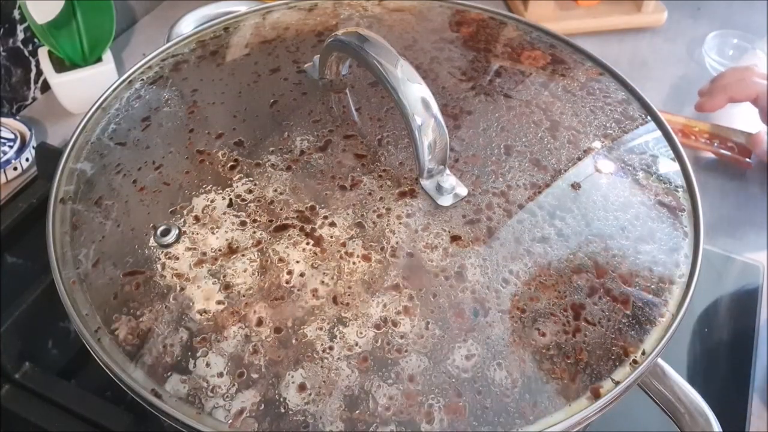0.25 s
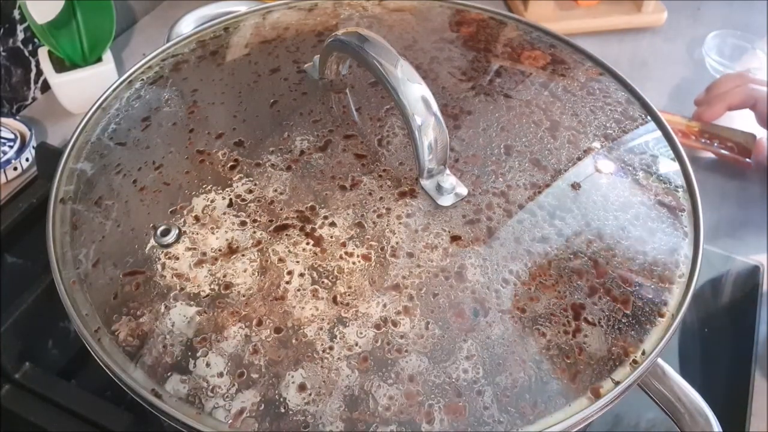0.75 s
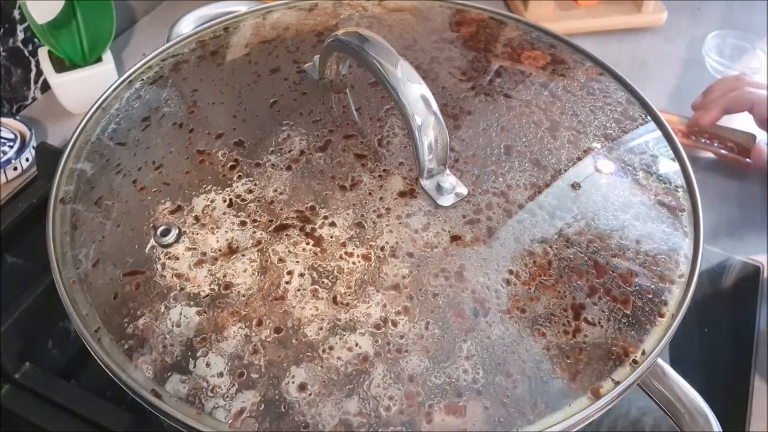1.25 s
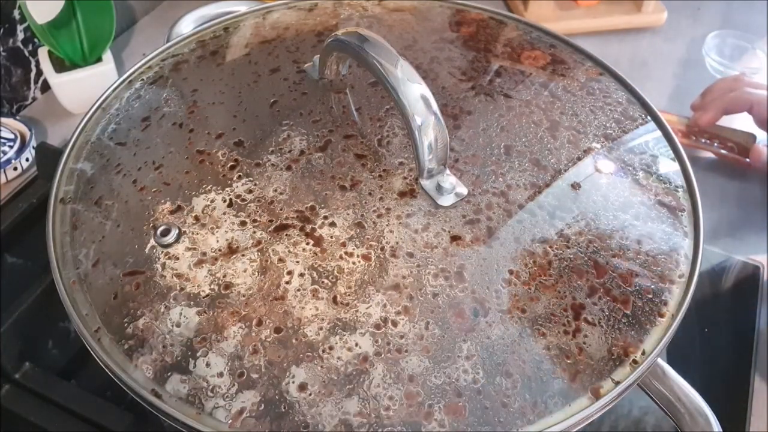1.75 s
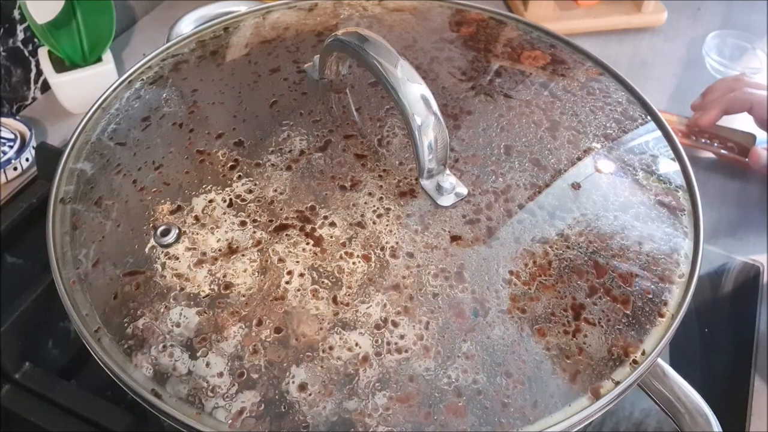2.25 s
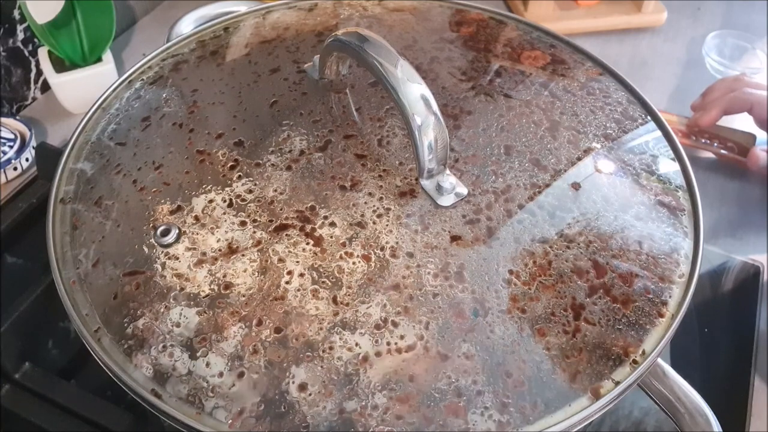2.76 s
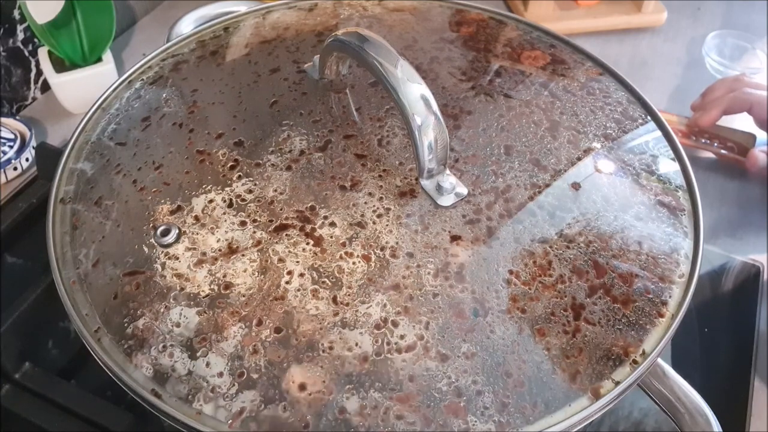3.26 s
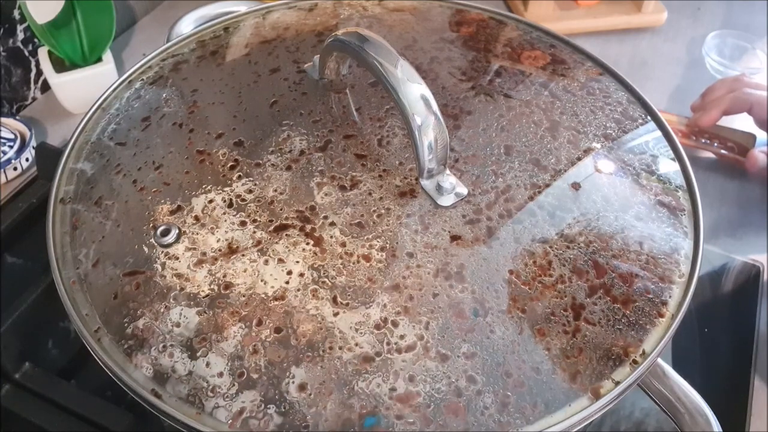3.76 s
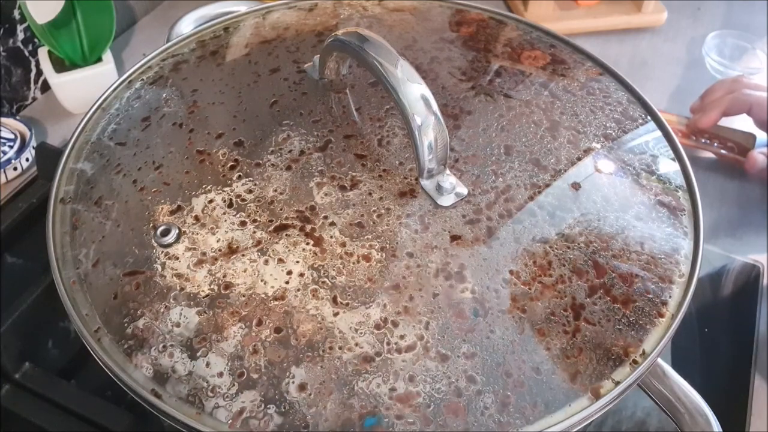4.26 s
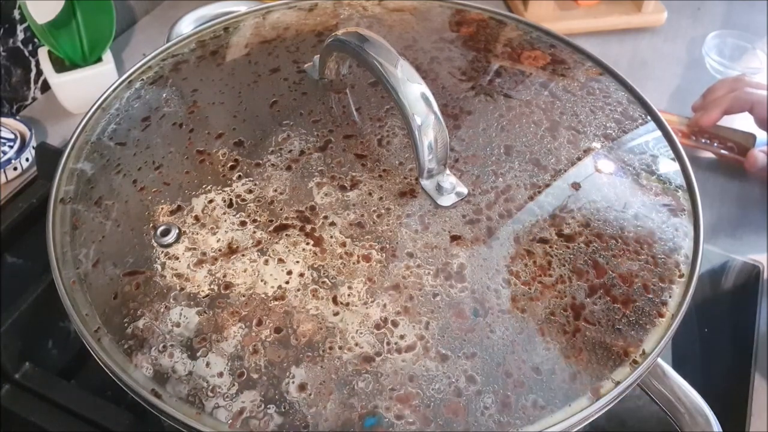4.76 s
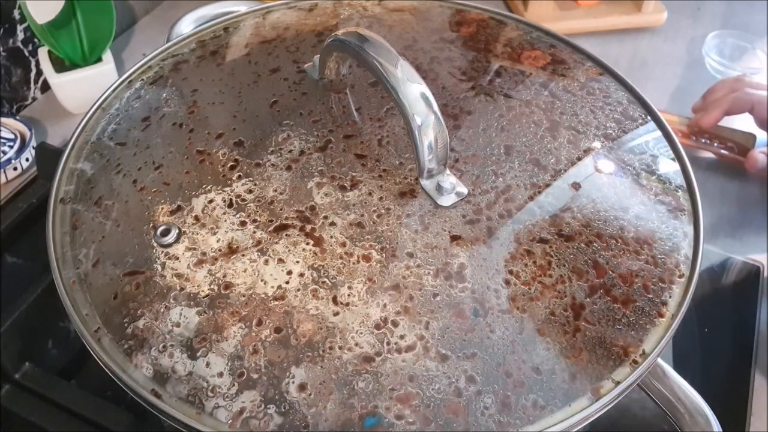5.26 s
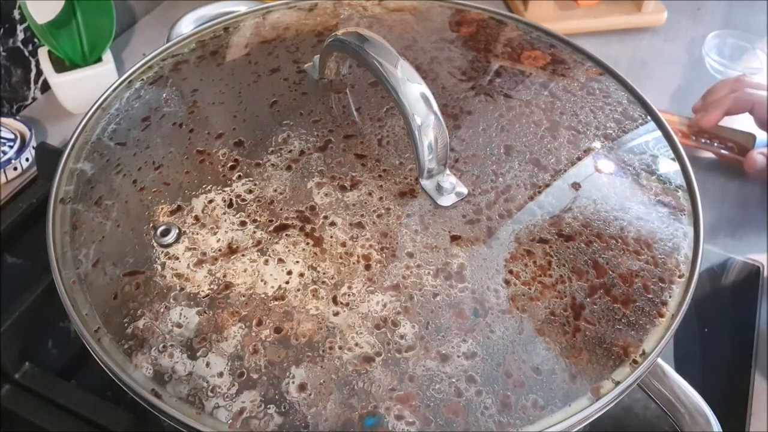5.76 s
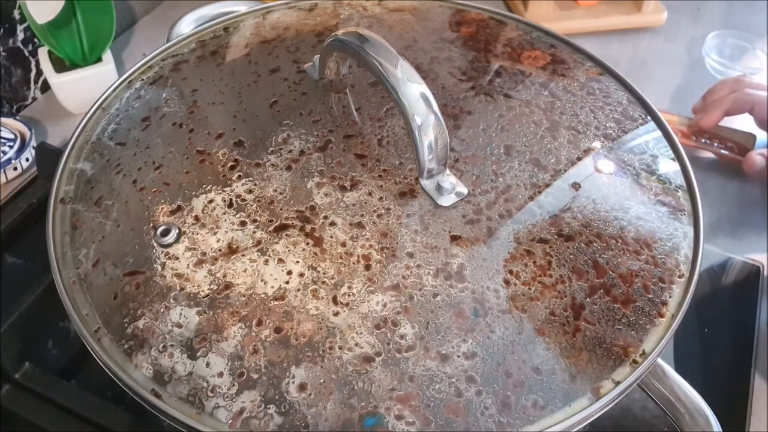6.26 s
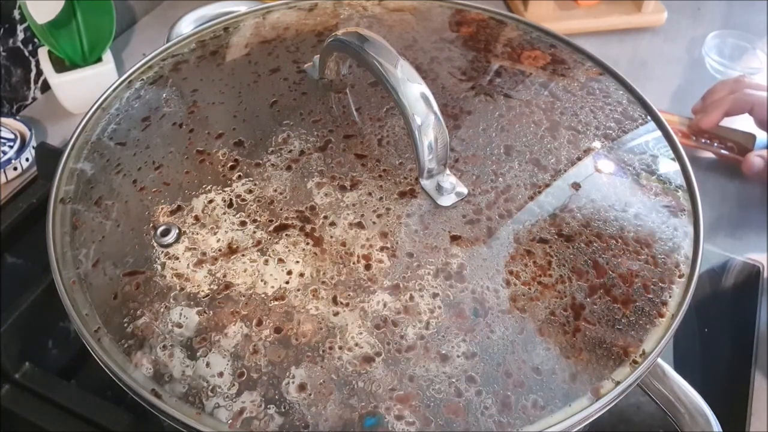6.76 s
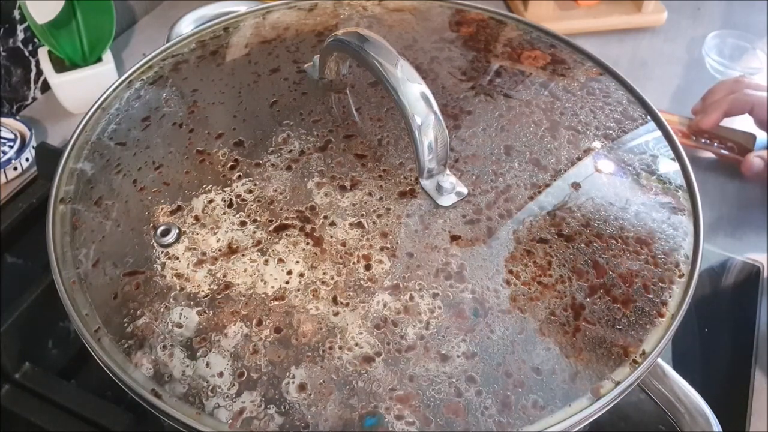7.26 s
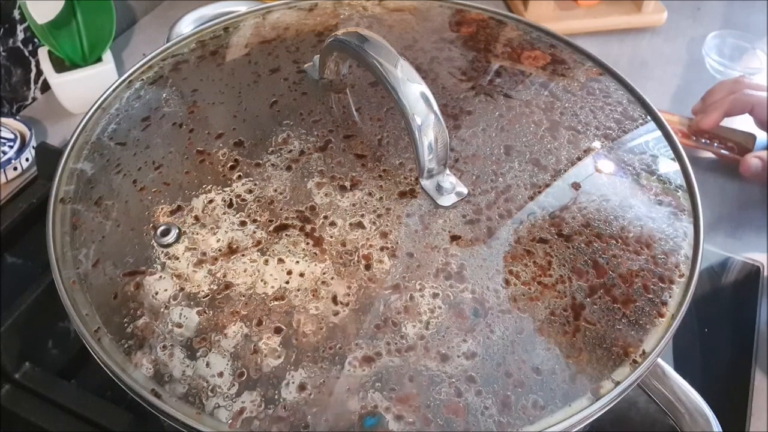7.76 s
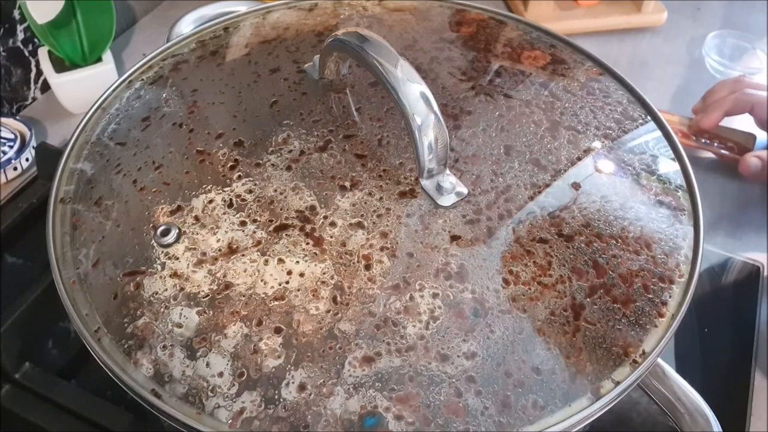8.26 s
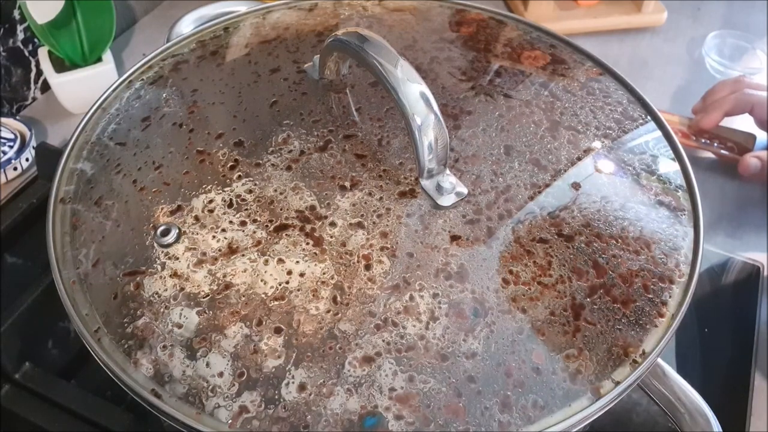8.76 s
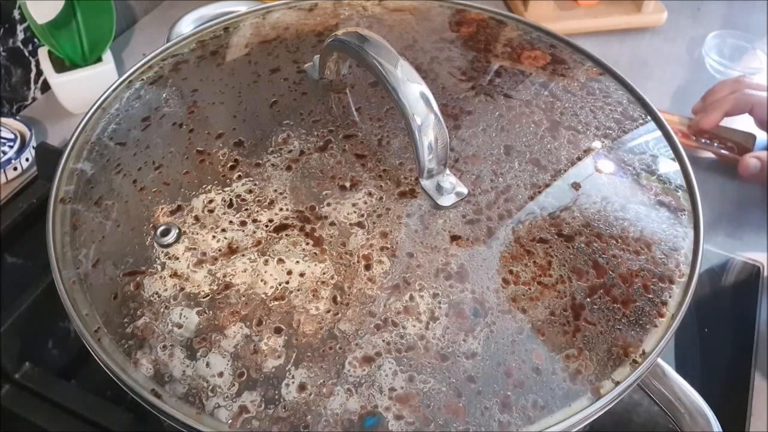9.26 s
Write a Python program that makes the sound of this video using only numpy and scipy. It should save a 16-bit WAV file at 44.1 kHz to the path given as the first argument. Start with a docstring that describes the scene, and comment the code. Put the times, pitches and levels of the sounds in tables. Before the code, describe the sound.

Popcorn bursts under a glass lid, heard close in stereo with slight room reflections. Each pop is a brief splintery crack with a pan knock and a muffled thump, some with a puff of steam. Quick pops at the start thin into scattered ones, kernels rattle off the lid, and the loudest flurry comes late before sparse pops end it. Soft hissing oil and steady low rumble stay behind.

```python
"""Popcorn pops, knocks and thumps over a faint oil sizzle and a low rumble, close by in a small kitchen.
Each kernel bursts in a steel pan under a glass lid: a crack of splintered noise that rings the pan modes,
a knock, a high steam fizz and a low thump of the air under the lid.
Hard kernels strike pan and lid as bursts of banded noise with ringing modes; split hulls jet swelling hiss.
The oil is shaped noise that flares after every burst; a diffuse noise tail is the room."""
import sys
import numpy as np
from scipy import signal
from scipy.fft import rfft, irfft
from scipy.io import wavfile

SR = 44100
rng = np.random.default_rng(int(sys.argv[2]) if len(sys.argv) > 2 else 0)


def transcribe(signal):
    """Save signal, clipped to [-1, 1], as a 16-bit WAV file at the path in sys.argv[1]."""
    frames = np.atleast_2d(signal).T
    limited = np.clip(frames, -1, 1)
    pcm = np.round(limited * 32767).astype(np.int16)
    wavfile.write(sys.argv[1], SR, pcm)


N = 418950
RING_S = np.arange(int(0.3 * SR)) / SR  # time axis of one event
MODE_T60_S = 0.058  # sudden decay of a mode at 2 kHz

# bursting kernels: (time [s], crack level [dB], hardest rung mode [Hz], next hardest [Hz],
# knock level [dB], knock mode [Hz], steam fizz level [dB], thump level [dB])
POPS = [(0.109, -45.5, 2610, 6030, -52, 1000, -56, -36), (0.191, -39, 2012, 5630, -37, 736, -66, -45.5),
        (0.413, -43, 1567, 3900, -51.5, 1290, -54, -38), (0.484, -42.5, 3870, 6040, -37.5, 995, -47, -34),
        (0.724, -38, 5880, 2007, -43, 1184, -50.5, -56), (0.854, -48.5, 4640, 1610, -37.5, 958, -52.5, -36),
        (0.904, -46.5, 2025, 1490, -41, 1255, -69, -46), (1.113, -38, 5870, 1544, -30.5, 1286, -50, -39),
        (1.282, -43.5, 3790, 5860, -40, 930, -50, -37), (1.921, -41, 1530, 4700, -37.5, 997, -55, -36),
        (2, -48.5, 5960, 2060, -40.5, 1200, -57.5, -38.5), (2.154, -45, 1615, 4715, -46, 900, -52.5, -39.5),
        (2.163, -44, 5932, 3064, -34, 1184, -56, -34), (2.382, -31, 4980, 7510, -43, 524, -37, -35),
        (2.691, -38, 6050, 3860, -57.5, 960, -42, -45.5), (2.729, -49, 2200, 3190, -49, 953, -86, -35.5),
        (3.214, -51.5, 2040, 5900, -68, 850, -63, -50.5), (3.273, -37, 3140, 2046, -37, 1237, -57, -40),
        (3.366, -50.5, 2590, 4880, -41.5, 745, -65, -46.5),
        (3.505, -34.5, 2535, 3940, -39, 960, -43.5, -39), (3.918, -41.5, 1660, 4720, -37, 1004, -47, -37.5),
        (4.251, -49, 3174, 5900, -42, 854, -63.5, -40.5),
        (4.367, -36.5, 1756, 2030, -41, 978, -49.5, -40.5),
        (5.098, -50.5, 1570, 4700, -51, 960, -63.5, -45), (5.184, -42, 4770, 2310, -38, 741, -67, -50),
        (5.388, -36.5, 2020, 5400, -35.5, 1195, -52.5, -37),
        (5.774, -39.5, 2035, 5900, -44.5, 755, -62, -47), (6.51, -33, 4900, 2640, -37, 751, -52, -37.5),
        (6.804, -37.5, 4760, 1970, -43.5, 1230, -63, -37.5),
        (6.924, -43, 6020, 2605, -40, 598, -54.5, -36.5), (7.113, -42, 3100, 4830, -46.5, 962, -70, -46),
        (7.611, -47, 1960, 3190, -38, 1277, -66, -39.5), (7.778, -51.5, 5930, 3000, -48, 960, -60, -52.5),
        (7.854, -48.5, 2460, 6147, -46.5, 570, -61, -37.5), (7.967, -29, 6200, 3900, -34, 1010, -36, -38.5),
        (8.068, -35.5, 5930, 4900, -48.5, 985, -50, -37), (8.466, -43.5, 3040, 2040, -35.5, 950, -64, -34),
        (8.578, -44, 2056, 5380, -52, 1160, -61, -35), (9.222, -48.5, 4800, 1580, -39.5, 730, -63, -35.5),
        (9.479, -53.5, 2130, 1540, -43, 985, -74, -51)]
# dense clatter inside the pan: (frequency [Hz], relative density [dB per Hz])
CLATTER = [(40, -32), (200, 1.5), (400, -1.5), (750, 1.5), (1400, -6), (3500, -0.5), (6000, -2.5),
           (7600, -4.5), (8900, -17.5), (11000, -10.5), (13000, -16), (15800, -26.5)]


def amp(db):
    """Decibels to gain."""
    return 10 ** (np.asarray(db) / 20)


def read(points, hz):
    """A table read on a log-frequency axis."""
    f, value = np.transpose(points)
    return np.interp(np.log(hz + 1), np.log(f + 1), value)


def evened(x, seconds=None):
    """Scales to rms 1, over the whole sound or over its first seconds."""
    head = x if seconds is None else x[..., :int(seconds * SR)]
    return x / np.sqrt(np.mean(head ** 2) + 1e-20)


def band(x, hz, kind, order=4):
    """A Butterworth filter."""
    return signal.sosfilt(signal.butter(order, hz, kind, fs=SR, output="sos"), x)


def add(mix, s, sound, left_db=0):
    """Places a sound at its time, left_db louder on the left at constant total power."""
    sides = np.sqrt(2 / (1 + amp(2 * np.array([[-left_db], [left_db]]))))
    part = mix[:, max(round(s * SR), 0):][:, :sound.shape[-1]]
    part += (sides * sound)[:, :part.shape[1]]


def noise(size, colour, likeness=0.33, lead_s=6e-5):
    """Coloured noise at two microphones, alike in the bass, less so above, reaching the left one first."""
    hz = np.fft.rfftfreq(size, 1 / SR)
    left, other = rfft(rng.standard_normal((2, size)))
    coherence = 1 - (1 - likeness) * (hz ** 2 + 130 ** 2) / (hz ** 2 + 450 ** 2)
    right = coherence * left + np.sqrt(1 - coherence ** 2) * other
    right = right * np.exp(-2j * np.pi * hz * lead_s)
    return evened(irfft(np.array([left, right]) * colour(hz), size))


def clatter_gain(hz):
    """Average spectrum of the clatter, as a gain."""
    return amp(read(CLATTER, hz))


def spot_colour(hz, ripple_db=5.0, ripple_hz=230):
    """Clatter from one spot: echoes between base and lid give every spot its own peaks and gaps."""
    steps = np.clip(rng.standard_normal(int(SR / 2 / ripple_hz) + 2), -2, 1)
    ripple = np.interp(hz / ripple_hz, np.arange(len(steps)), steps)
    return amp(read(CLATTER, hz) + ripple_db * ripple)


def splinters(spread_db=3.0, step=50):
    """A hull breaks in an uneven run of tiny cracks: a gain drifting between random values 50 samples apart."""
    values = np.clip(rng.standard_normal(len(RING_S) // step + 2), -2, 2)
    return amp(spread_db * np.interp(np.arange(len(RING_S)) / step, np.arange(len(values)), values))


def favour(hz, centre_hz, octaves, skirt_db):
    """A broad hump of gain over a skirt: the band that a blow excites most; 1/e at 2 * octaves."""
    return np.exp(-(np.log2((hz + 1) / centre_hz) / (2 * octaves)) ** 2) + amp(skirt_db)


def ring(hz, db, t60_s, linger_db=-22, linger_t60_s=0.21, step=80):
    """Modes lose most energy to the corn at once, high ones fastest; glass-lid modes linger faintly.

    The rattling corn blurs their pitch. t60_s holds at 2 kHz.
    """
    hz, db, t = np.reshape(hz, (-1, 1)), np.reshape(db, (-1, 1)), RING_S[:step * step]
    turn, apart = rng.standard_normal((2, len(hz), 1))
    blur_hz = 40 * np.sqrt(hz / 1000)
    pitch_hz = hz + blur_hz * rng.standard_normal((len(hz), step))
    phase = np.float32(2 * np.pi * (np.cumsum(np.repeat(pitch_hz / SR, step, 1), 1) + turn))
    # short waves differ more between the microphones
    shift = np.float32(hz / 2200 * (1.22 * apart - 1))
    lid = sum(favour(hz, lid_hz, 0.19, -22) for lid_hz in (970, 2626))  # the lid rings longest here
    linger = amp(linger_db - 60 * t / linger_t60_s) * lid
    sudden = amp(-60 * t / t60_s * (hz / 2000) ** 0.22)
    decay = (sudden + linger) * (1 - np.exp(-t / 0.0013))
    pair = np.array([(amp(db) * decay * np.sin(phase + p)).sum(0) for p in (0, shift)])
    return np.pad(pair, [(0, 0), (0, len(RING_S) - len(t))])


def one_mode(hz):
    """The ring of a single mode that a blow hits squarely."""
    return evened(ring(hz, 0, MODE_T60_S), 0.009)


def pan_ring(weight, t60_s=MODE_T60_S, spot_db=1.0, detune=0.0055):
    """The modes ring unevenly, depending on the spot where the pan is excited."""
    # modes of pan, lid and the air between: (frequency [Hz], relative level [dB])
    modes = [(560, 1.5), (750, -3), (980, 2.5), (1228, 1.5), (1550, -8.5), (1880, -4.5), (2050, 2.5),
             (2510, -3.5), (2890, -10.5), (3110, 2.5), (3450, -1.5), (3830, -3.5), (4765, 7.5), (5383, 3.5),
             (5920, 6), (6092, 5.5)]
    hz, db = np.transpose(modes)
    spot, drift = rng.standard_normal((2, len(modes)))
    level_db = db + spot_db * spot + 20 * np.log10(weight(hz))
    return evened(ring(hz * (1 + detune * drift), level_db, t60_s), 0.058)


def rumble():
    """The kitchen's steady rumble: noise weighted to the bass."""
    # rumble spectrum: (frequency [Hz], relative density [dB per Hz])
    rumble_spectrum = [(22, -25.5), (45, 4), (118, 2.5), (170, -20.5), (300, -10.5), (430, -16.5),
                       (650, -11.5), (1200, -23), (2200, -23), (16000, -57)]
    return amp(-65.5) * noise(N, lambda hz: amp(read(rumble_spectrum, hz)), likeness=0.093)


def kitchen(x, onset_s=0.00077):
    """Diffuse reflections from walls and worktop: noise whose bands decay at their own rates."""
    # reverberation: (frequency [Hz], t60 [s])
    room_t60 = [(100, 0.37), (300, 0.4), (1500, 0.34), (6000, 0.29), (14000, 0.35)]
    hz, t, z = signal.stft(noise(SR, np.ones_like, likeness=0.06), SR, nperseg=256)
    shared = np.exp(-(hz / 600) ** 2)[:, None]  # long waves reach both microphones alike
    z[1] = shared * z[0] + np.sqrt(1 - shared ** 2) * z[1]
    decay = amp(-60 * t / read(room_t60, hz)[:, None]) * (1 - np.exp(-(t / onset_s) ** 2))
    tail = signal.istft(z * decay, SR, nperseg=256)[1]
    return signal.fftconvolve(x, tail / np.linalg.norm(tail[0]), axes=1)[:, :N]


def sizzle_level():
    """Bursts spray moisture that flares and boils off; steady oil, flares and leaks add in power."""
    # kernels leaking moisture slowly: (time of height [s], level [dB], half length to 1/e [s])
    leaks = [(0.296, -59, 0.83), (9.35, -66, 0.3)]
    oil_db = -75
    flare_base_db, usual_fizz_db = -63.5, -50  # flare before rise and fade, at the usual fizz
    flare_db_per_fizz_db = 0.36
    rise_s, fade_db_per_s = 0.03, 37
    t = np.arange(N) / SR
    coarse_s = t[::100]
    power = np.full(len(coarse_s), amp(oil_db) ** 2)
    for s, *_, fizz_db, _ in POPS:
        age_s = np.maximum(coarse_s - s, 0)
        flare_db = flare_base_db + flare_db_per_fizz_db * (fizz_db - usual_fizz_db)
        flare_db = flare_db - fade_db_per_s * age_s
        power += (amp(flare_db) * (1 - np.exp(-age_s / rise_s))) ** 2
    for s, db, half_s in leaks:
        power += (amp(db) * np.exp(-((coarse_s - s) / half_s) ** 2)) ** 2
    return np.interp(t, coarse_s, np.sqrt(power))


def sizzle(bubbles_per_s=260, bubble_db=-8, bubble_fade_s=0.0071):
    """A fine hiss of hot oil; tiny bubbles bursting in it lift its level briefly."""
    # oil spectrum: (frequency [Hz], relative density [dB per Hz])
    oil_spectrum = [(300, -4.5), (1500, -4.5), (3500, -8), (6800, -2.5), (8000, -6), (9200, -12.5),
                    (11000, -5), (15800, -14)]
    sizes = amp(2.0 * np.minimum(rng.exponential(1, N), 4))
    starts = sizes * (rng.random(N) < bubbles_per_s / SR)
    bubbles = evened(signal.lfilter([1], [1, -np.exp(-1 / (bubble_fade_s * SR))], starts))
    hiss = noise(N, lambda hz: amp(read(oil_spectrum, hz)), likeness=0.085)
    return sizzle_level() * evened(hiss * (1 + amp(bubble_db) * bubbles))


def jets(bright=0.82):
    """Steam sputters from a split hull: clatter noise tilted to the treble, swelling and dying away."""
    # steam jets: (time [s], level at the height [dB], length, twice the swell time [s])
    steam_jets = [(0.495, -47, 0.059), (1.131, -36, 0.028), (1.367, -47, 0.015), (5.197, -46.5, 0.019),
                  (7.8, -44, 0.017), (8.5, -50, 0.044)]
    out = np.zeros((2, N))
    for s, db, length_s in steam_jets:
        u = RING_S / (length_s / 2)
        swell = (u * np.exp(1 - u)) ** 2
        hiss = noise(len(RING_S), lambda hz: clatter_gain(hz) * hz ** bright, likeness=0.27)
        add(out, s, amp(db) * hiss * splinters() * swell)
    return out


def bounces(contact_s=0.0029, rebound_db=-13, within_s=0.07, count=6):
    """A sharp contact, then a few weak rebounds as the kernel rattles to rest."""
    ticks = np.exp(-RING_S / contact_s)
    for s in within_s * (np.arange(count) + rng.random(count)) / count:
        fade = np.exp(-abs(RING_S - s) / contact_s - 2 * s / within_s)
        ticks = ticks + amp(rebound_db) * (RING_S > s) * fade
    return ticks


def strikes(ring_db=-8, main_db=-6, t60_s=0.044, skirt_db=-25, low_cut=2.4, shade_hz=3400):
    """A hard kernel hits pan or lid: the contact time picks the band that rings, with little below it."""
    # kernels striking steel or glass: (time [s], level [dB], centre [Hz], spread [octaves],
    # hardest rung mode [Hz])
    hits = [(0.145, -49.5, 690, 1, 530), (0.339, -45.5, 2800, 0.34, 2970), (0.53, -47, 1710, 0.75, 1270),
            (1.149, -49, 6480, 0.98, 5830), (1.183, -52, 2160, 0.22, 2200), (1.765, -68, 590, 0.49, 545),
            (1.938, -31.5, 3840, 1.2, 2130), (1.962, -30.5, 4160, 0.66, 2564), (2.041, -47, 970, 0.3, 930),
            (2.193, -48, 2580, 0.66, 3160), (2.249, -36.5, 4500, 0.55, 2244), (2.255, -33, 4930, 0.6, 4200),
            (2.397, -42.5, 910, 0.69, 1277), (2.759, -57.5, 1140, 0.6, 1240),
            (4.384, -31.5, 4370, 0.36, 4742), (4.392, -35.5, 4140, 0.59, 4370), (4.41, -44, 756, 0.54, 750),
            (4.43, -37.5, 2340, 0.57, 1957), (4.441, -38.5, 3940, 0.2, 3420),
            (4.655, -45, 4220, 0.39, 3849), (5.154, -51.5, 553, 0.32, 570),
            (5.458, -33.5, 3100, 0.58, 2073), (5.798, -47.5, 1620, 0.33, 1586),
            (7.214, -58.5, 3920, 0.77, 3940), (7.885, -25, 3640, 0.63, 1902),
            (7.931, -39, 3350, 0.18, 3073), (7.975, -28.5, 6600, 0.24, 6070),
            (7.987, -24.5, 2560, 0.21, 2456), (8.014, -44, 2880, 0.25, 2870), (8.521, -44, 1650, 0.51, 970)]
    out = np.zeros((2, N))
    for s, db, centre_hz, octaves, mode_hz in hits:
        def contact(hz):
            return favour(hz, centre_hz, octaves, skirt_db)
        clatter = noise(len(RING_S), lambda hz: contact(hz) * spot_colour(hz),
                        likeness=0.28, lead_s=rng.uniform(0, 0.00028))
        tick = 2.2 * bounces()  # the instant of contact stands out of the clatter
        clatter = clatter * splinters() * (tick + amp(-60 * RING_S / t60_s))
        clack = evened(clatter, 0.0041) + amp(ring_db) * pan_ring(contact)
        clack = band(clack, centre_hz / 2 ** (low_cut * octaves), "high")
        clack = clack + amp(main_db) * one_mode(mode_hz)
        # bright hits are shaded at the right microphone
        add(out, s, amp(db) * evened(clack, 0.022), (centre_hz / shade_hz) ** 3)
    return out


def thump(hz=126, swell_s=0.0026, loose=0.07):
    """Sudden steam heaves the air under the lid for a few cycles and leaves a faint, loose boom."""
    # slow booming of pan and stove: (frequency [Hz], relative level [dB], t60 [s])
    low_modes = [(115.4, -16.5, 0.37), (286.8, -25, 0.27)]
    peak_s = 3 * swell_s
    u = RING_S / peak_s
    heave_hz = hz * rng.normal(1, loose)
    heave = (u * np.exp(1 - u)) ** 3 * np.cos(2 * np.pi * heave_hz * (RING_S - peak_s))
    boom = np.zeros(len(RING_S))
    for f, db, t60_s in low_modes:
        cycles = f * rng.normal(1, loose / 2) * RING_S + rng.random()
        boom += amp(db - 60 * RING_S / t60_s) * np.cos(2 * np.pi * cycles)
    return evened(heave + boom * (1 - np.exp(-u ** 2)), 0.022)


def hull_split(swell_s=0.0044):
    """The hull starts to split just before it bursts: decaying clatter turned round to swell."""
    split = noise(len(RING_S), clatter_gain) * splinters() * np.exp(-RING_S / swell_s)
    return split[:, :round(10 * swell_s * SR)][:, ::-1]


def hull_tear():
    """The torn hull rattles round the pan: splintered clatter that dies away in steps of slope."""
    # burst envelope: (time after the burst [s], relative level [dB])
    burst_fade = [(0, -3), (.007, -3), (.015, -6.5), (.03, -21), (.08, -53.5), (.3, -130)]
    tear = amp(np.interp(RING_S, *np.transpose(burst_fade))) * splinters()
    return tear * noise(len(RING_S), spot_colour, likeness=0.41, lead_s=rng.uniform(0, 0.00023))


def pan_knock(burst, knock_hz, knock_db=-2.5, low_mode_db=4, hollow_db=-6):
    """The body of a burst: its lows, the pan modes near the knock and a short hollow ring."""
    knock = amp(knock_db) * pan_ring(lambda hz: favour(hz, knock_hz, 0.54, -np.inf), t60_s=0.036)
    knock = knock + amp(low_mode_db) * one_mode(knock_hz)
    hollow = evened(ring(knock_hz, 0, 0.0059, linger_db=-np.inf), 0.22)
    lows = evened(band(burst, 1500, "low"), 0.025)
    return evened(lows + knock + amp(hollow_db) * hollow, 0.0068)


def sharp_crack(burst, mode_hz, second_hz, main_db=-2, second_db=-5):
    """The mid band of a burst with the two modes that its spot rings hardest."""
    mids = evened(band(burst, (1500, 8000), "band"), 0.016)
    modes_rung = amp(main_db) * one_mode(mode_hz) + amp(second_db) * one_mode(second_hz)
    return evened(mids + modes_rung, 0.025)


def pops(ring_db=-2, split_db=-5):
    """Each hull splits and tears in milliseconds; the spot where it bursts picks the modes that stand out."""
    cracks, thumps = np.zeros((2, 2, N))
    for s, crack_db, mode_hz, second_hz, knock_db, knock_hz, fizz_db, thump_db in POPS:
        clatter = hull_tear()
        rung = pan_ring(lambda hz: favour(hz, mode_hz, 1.0, 0))
        burst = evened(clatter, 0.039) + amp(ring_db) * rung
        body = pan_knock(burst, knock_hz)
        crack = sharp_crack(burst, mode_hz, second_hz)
        fizz = evened(band(clatter, 7090, "high", order=6), 0.034)
        split = hull_split()
        side_db = rng.normal(1.2, 1)  # the treble is shaded most at the right microphone
        add(cracks, s - split.shape[1] / SR, amp(crack_db + split_db) * split, side_db)
        add(cracks, s, amp(knock_db) * body, side_db / 2)
        add(cracks, s, amp(crack_db) * crack, side_db)
        add(cracks, s, amp(fizz_db) * fizz, side_db + 4.5)
        add(thumps, s, amp(thump_db) * thump())
    return cracks, thumps


def scene():
    """The pan on the stove, its reflections and the kitchen's rumble."""
    cracks, thumps = pops()
    bright = cracks + strikes() + jets()
    reflections = kitchen(amp(-7.0) * bright + amp(-8.5) * thumps)
    return rumble() + reflections + sizzle() + bright + thumps


def record(dry):
    """Bass cut and steep upper band limit."""
    cut = band(dry, 23, "high", order=2)
    lowpass = signal.firwin(511, 15950, window=("kaiser", 9), fs=SR)
    return signal.oaconvolve(cut, lowpass[None], "same")


dry = scene()
out = record(dry)
transcribe(out)
```